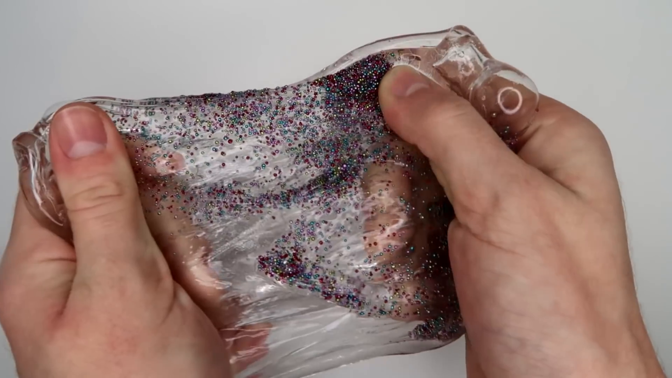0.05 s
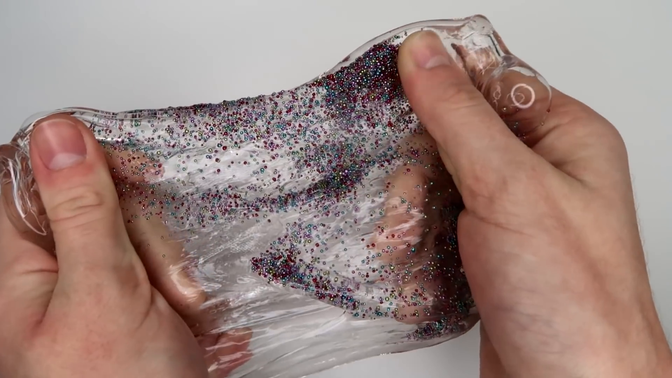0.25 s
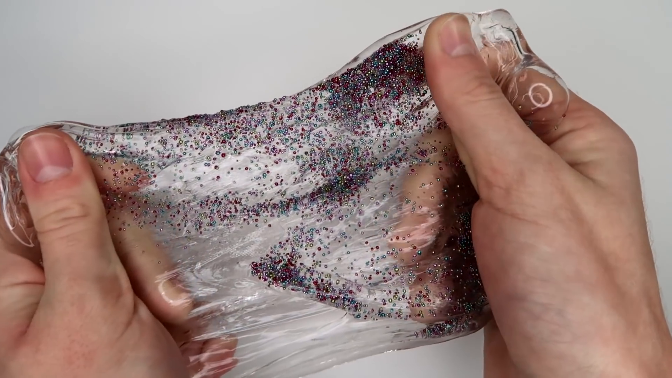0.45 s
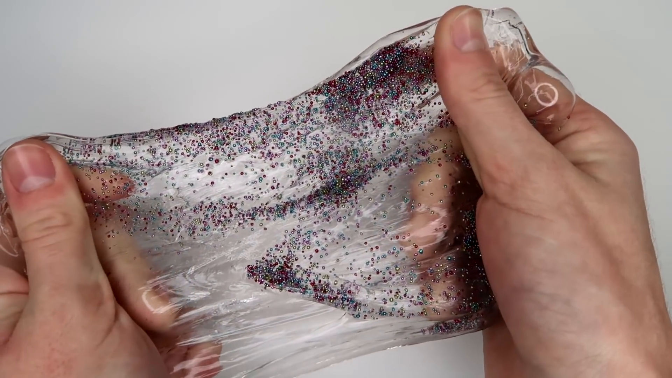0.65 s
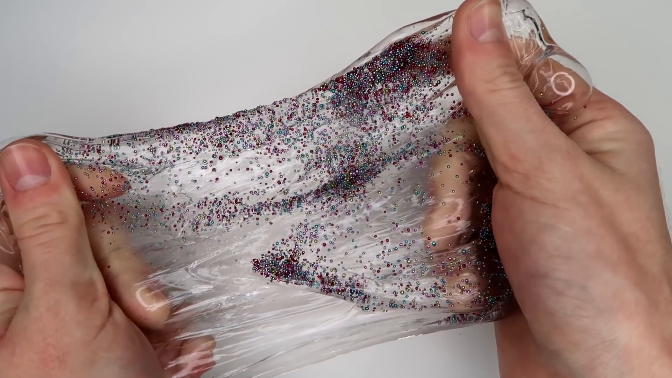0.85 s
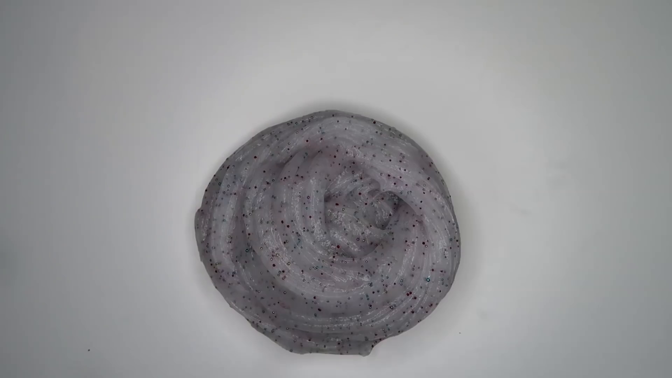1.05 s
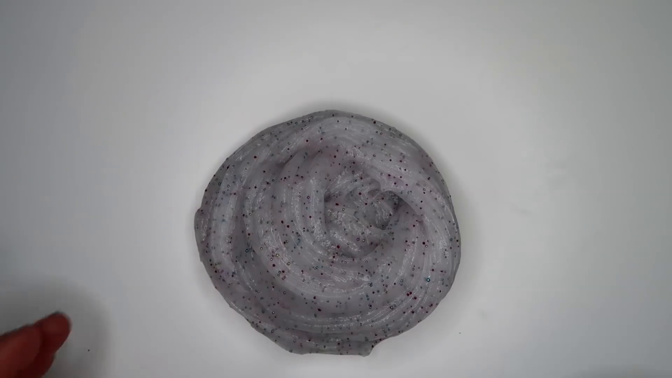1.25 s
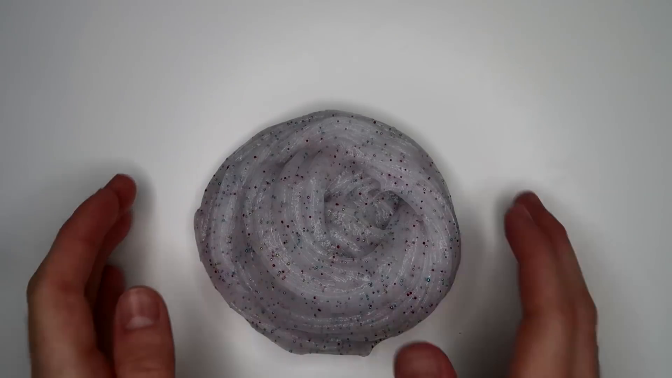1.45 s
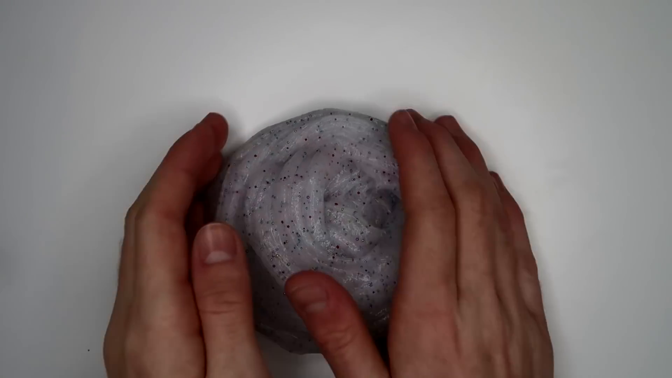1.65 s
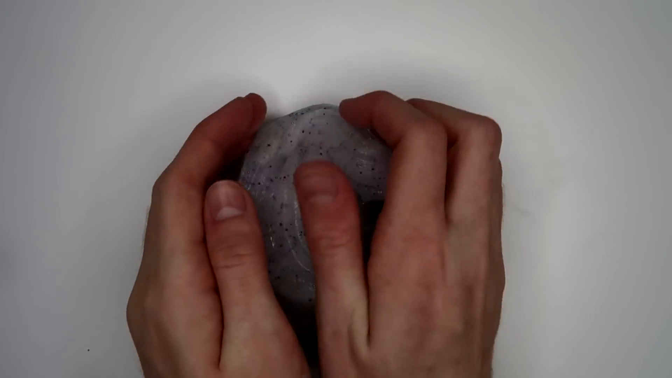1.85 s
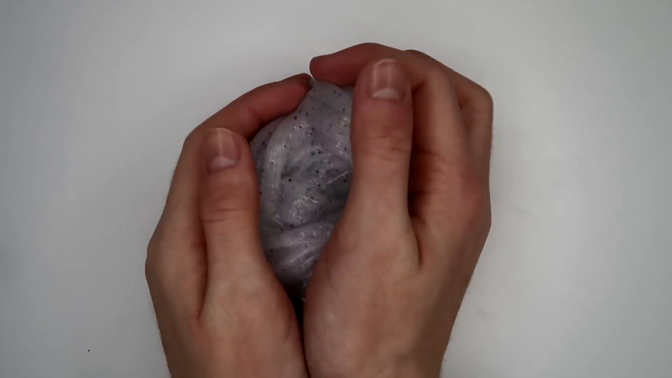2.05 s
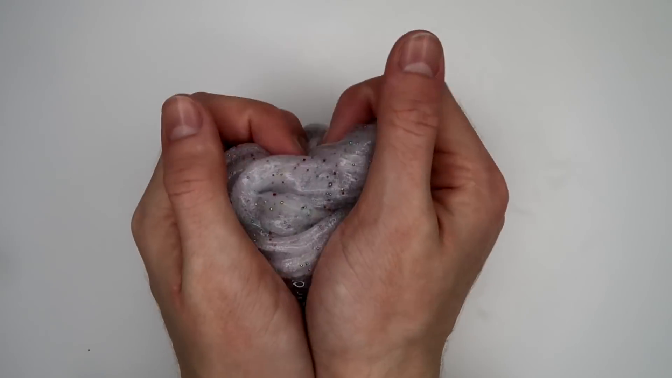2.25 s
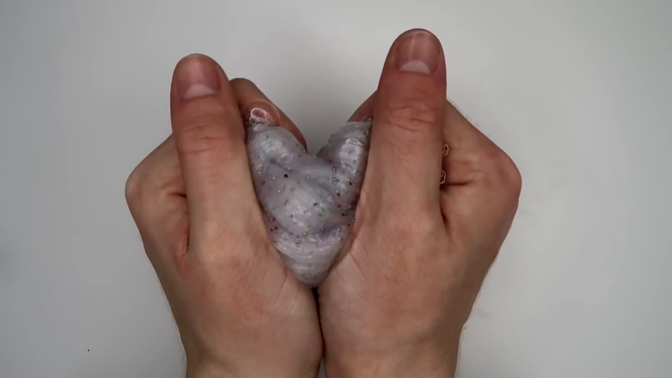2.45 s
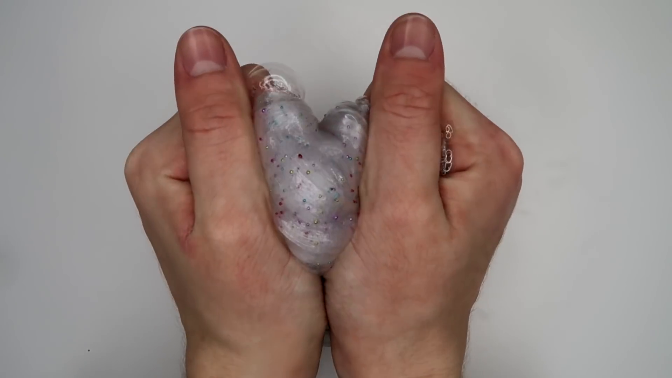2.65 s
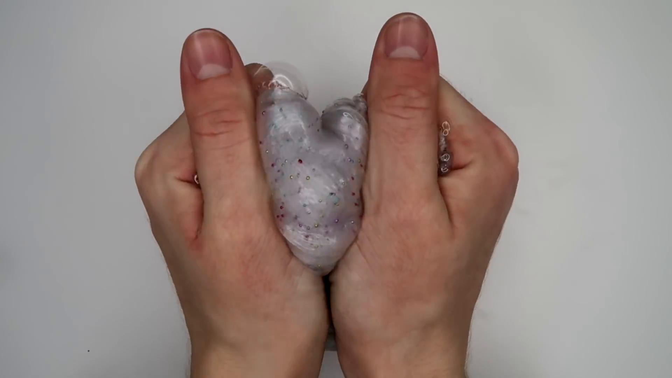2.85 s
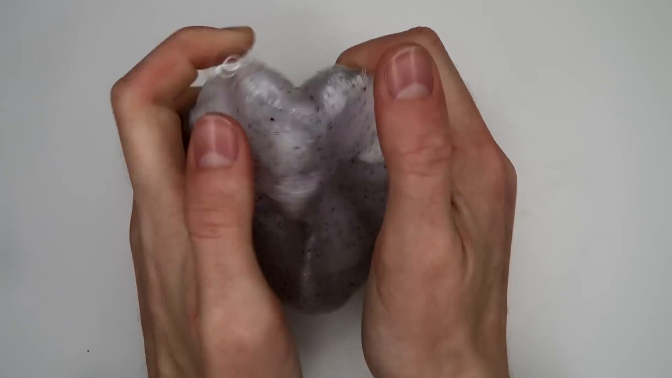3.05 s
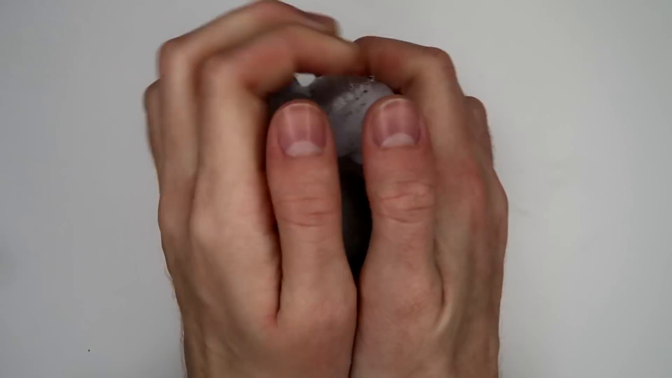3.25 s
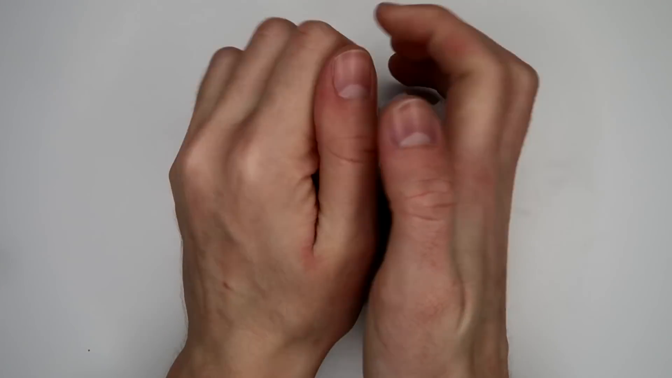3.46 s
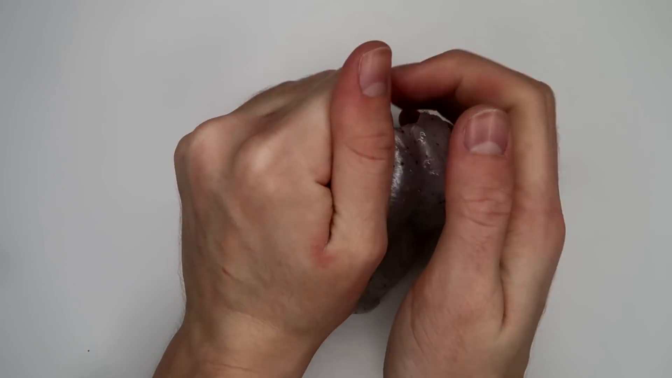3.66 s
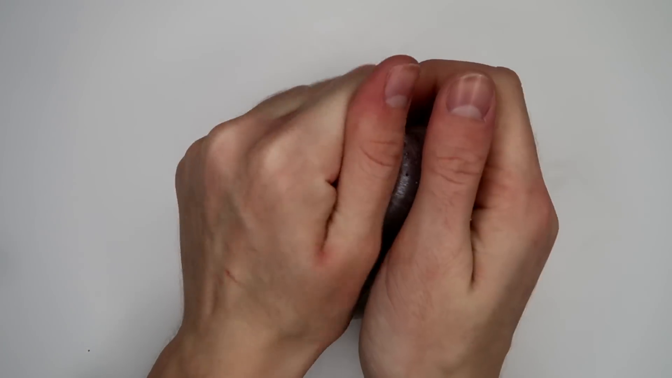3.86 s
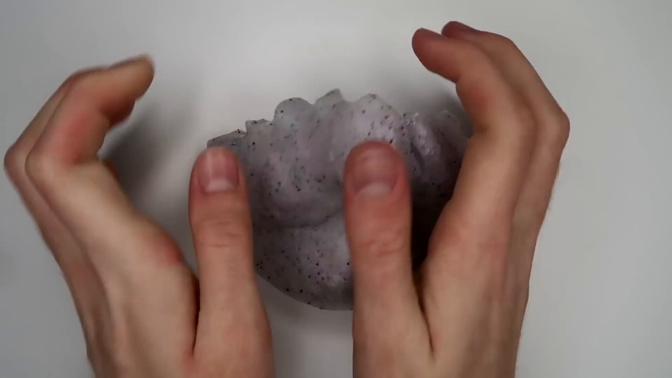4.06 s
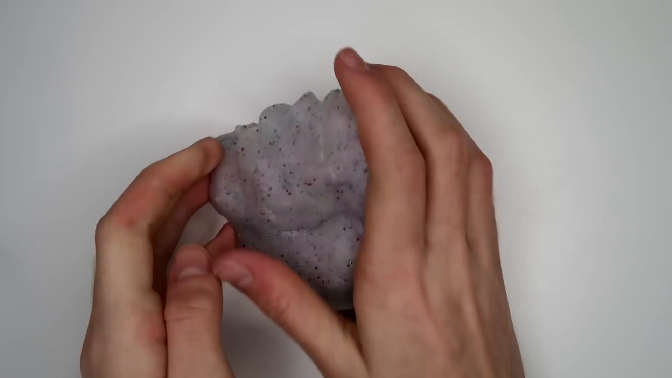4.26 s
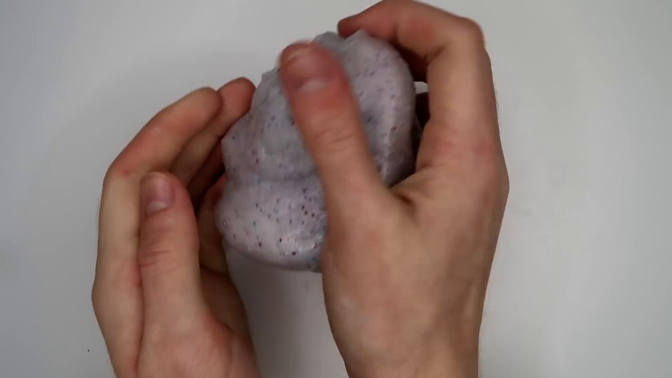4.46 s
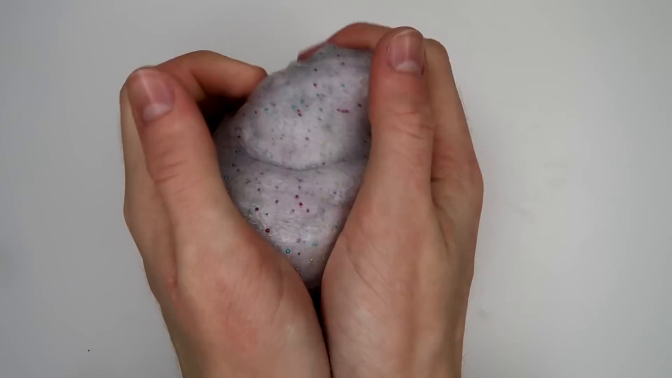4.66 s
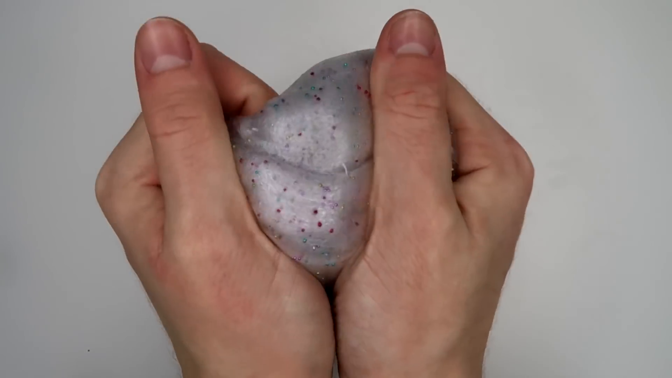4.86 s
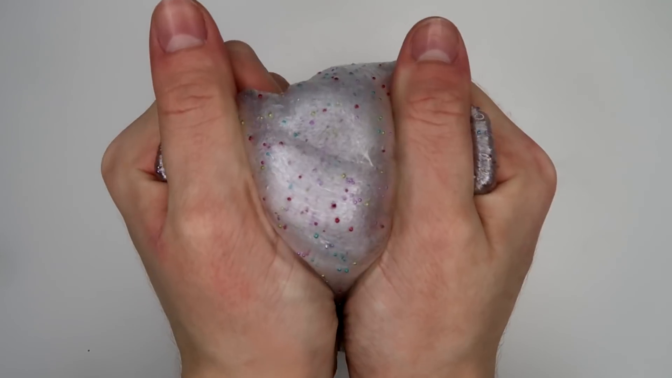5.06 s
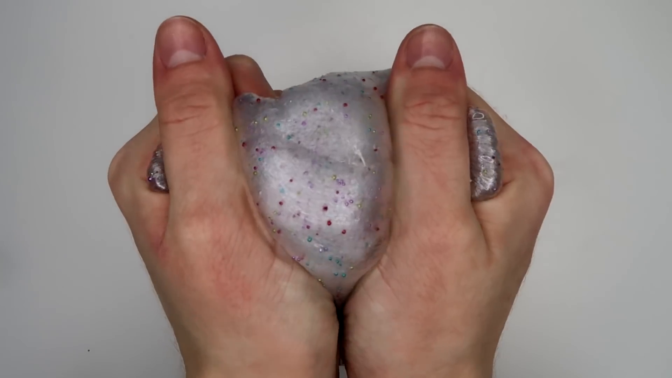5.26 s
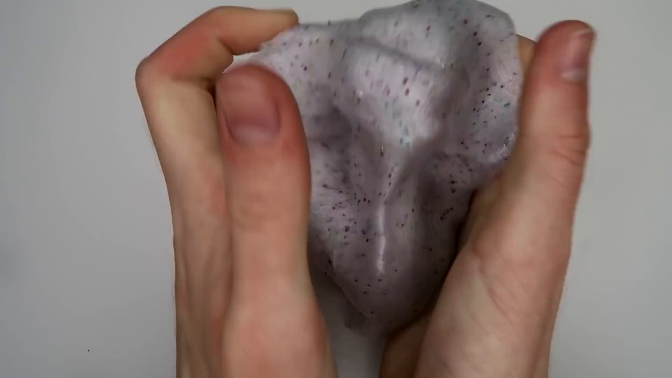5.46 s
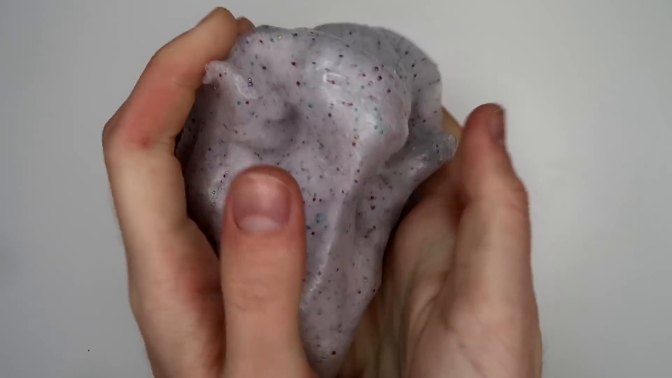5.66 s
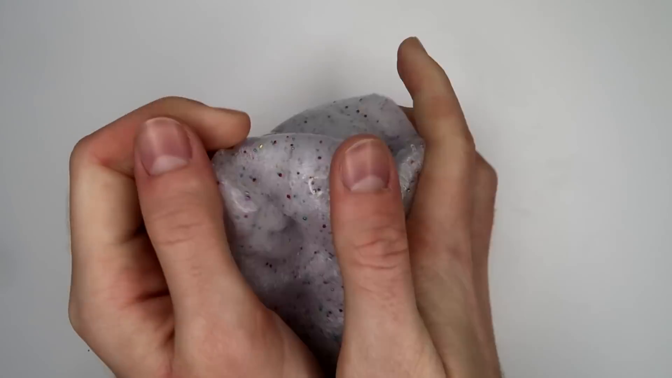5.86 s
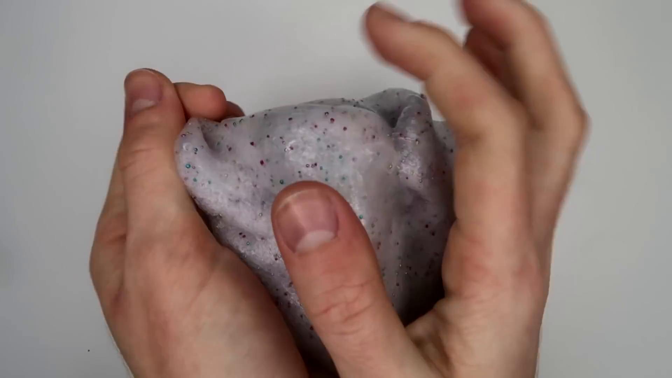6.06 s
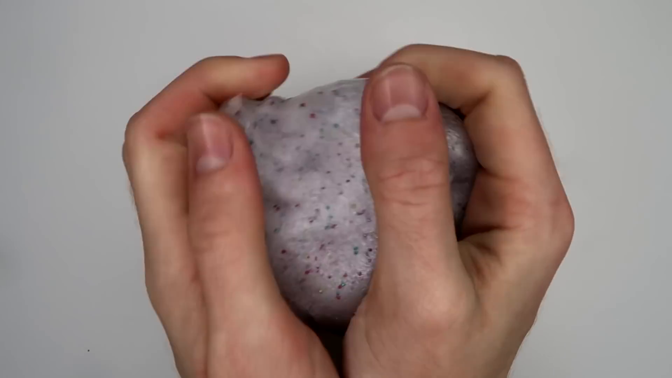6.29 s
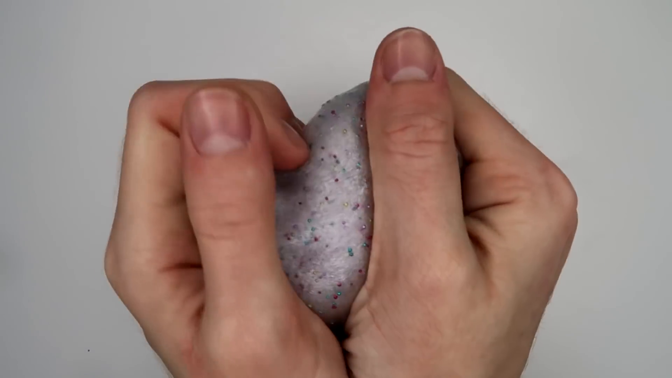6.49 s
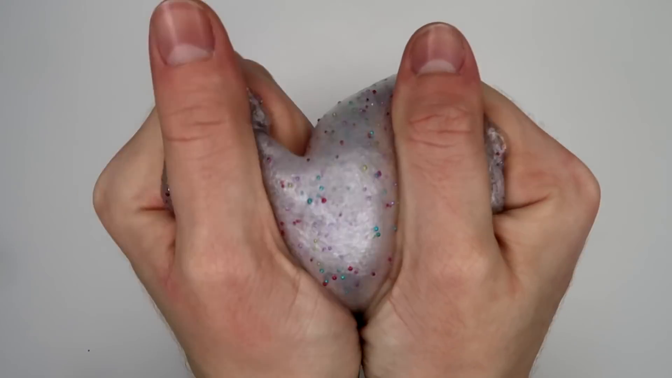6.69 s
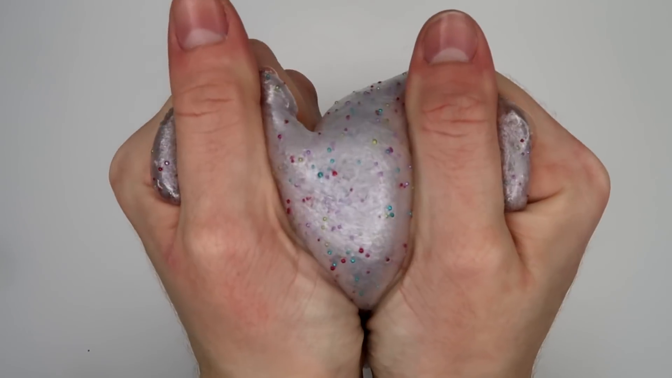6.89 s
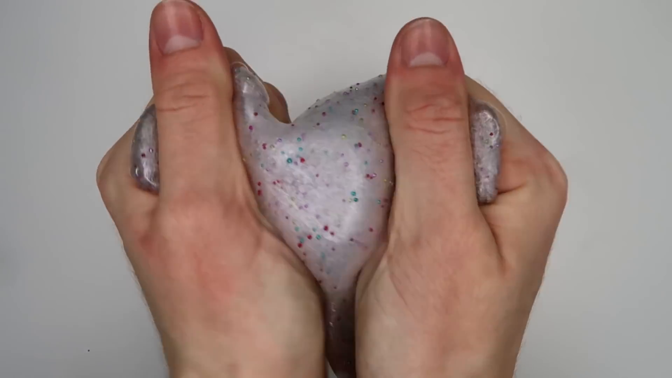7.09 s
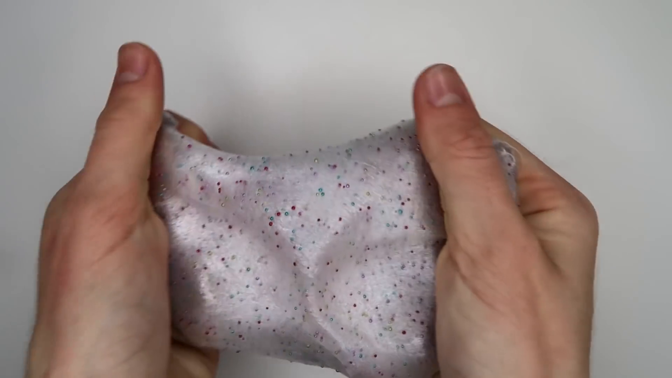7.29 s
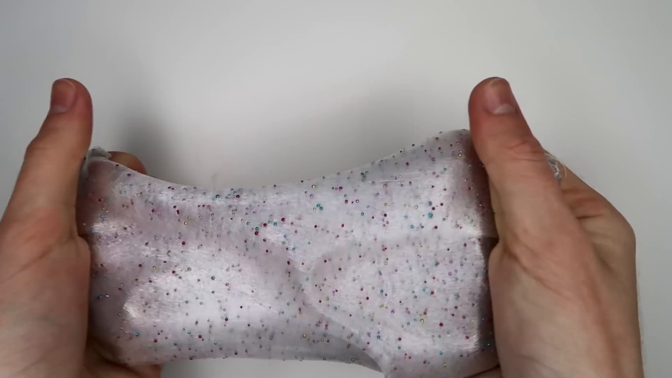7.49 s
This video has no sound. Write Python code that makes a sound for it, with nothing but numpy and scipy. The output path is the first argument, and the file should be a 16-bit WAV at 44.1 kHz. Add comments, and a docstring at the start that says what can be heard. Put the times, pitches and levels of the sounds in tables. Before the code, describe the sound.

Quiet air hiss and low mains hum open, with a couple of dull table knocks. Then two hands knead sticky slime: dense wet crackle swells and fades, small threads snap, and trapped air bursts in sharp ringing pops, some loud enough to distort. A sparser lull follows before more squeezing and crackling. Very close stereo microphone, small room, quick faint table echoes.

```python
"""Air noise and mains hum are heard first and run throughout, with dull knocks before and during the kneading.
Two hands knead sticky slime above a table: skin peels off the goo in dense wet crackle, made of countless
ringing grains and thicker snapping threads; air inside the lump blips softly.
Trapped air pockets burst as short ringing pops, loud enough to overload.
Table and palms throw quick delayed echoes, the small room a short noise tail, into two close microphone ports."""
import sys
import numpy as np
from scipy import signal
from scipy.fft import rfft, irfft
from scipy.io import wavfile

SR = 44100
rng = np.random.default_rng(int(sys.argv[2]) if len(sys.argv) > 2 else 0)


def to_wav(sig):
    """Store sig (one row per channel, or 1-D mono) as 16-bit WAV at the path in sys.argv[1].

    Samples outside -1..1 are clipped; the rate is SR.
    """
    pcm = np.clip(np.atleast_2d(sig), -1, 1) * 32767
    pcm = np.round(pcm).astype(np.int16)
    wavfile.write(sys.argv[1], SR, pcm.T)  # frames by channels


N = 332073

# bursting air pockets: start_s, level_db, pocket_hz (at the start), palm_hollow_hz,
# hollow_db and snap_db (both relative to level_db)
POPS = [(2.126, -29.5, 2420, 1400, -1.5, -5), (2.2, -25, 2100, 1310, 4.5, -5),
        (2.2631, -31.5, 3300, 890, -20, 1), (2.2673, -24.5, 3440, 1500, -1.5, -2.5),
        (2.291, -22.5, 7040, 1490, -28, -3), (2.3587, 1, 4030, 560, -6, -5),
        (2.3601, 7, 3360, 1380, -6, -4), (2.413, -16, 2270, 1730, 0.5, -1.5),
        (2.489, -28, 3050, 357, 0, 12.5), (2.52, -34, 4110, 846, 3, 1), (2.5455, 6, 3055, 681, -14, -4.5),
        (2.5992, 10.5, 5680, 1350, -13, -10.5), (2.6211, -2, 5500, 1430, -14, -10),
        (2.6454, -2.5, 2330, 693, -6.5, 4.5), (2.7046, -32, 2460, 695, 1, -5),
        (2.751, -27, 3060, 1150, -20, 12), (2.771, -17, 3200, 1460, -14, 3),
        (2.8125, 2, 6140, 764, -16.5, -9), (2.8128, -7.5, 2970, 770, -31, -24),
        (2.872, -26.5, 2940, 1040, -8.5, -31), (2.959, -34, 3440, 390, -3, -28),
        (3.026, -33, 2620, 560, -1, -23), (3.071, -30.5, 2520, 790, -5, -34.5),
        (3.153, -38.5, 2450, 1435, 7.5, -28), (3.384, -30.5, 5400, 750, -8, -38),
        (3.4581, -21, 2320, 1370, 0.5, -9), (3.6035, -28, 2680, 925, -8, 3),
        (3.608, -21, 3440, 500, -14.5, -11), (3.634, -22.5, 1670, 840, 0, -21),
        (3.6375, -19, 3000, 870, -2, -23), (3.6485, -30, 2680, 1400, -20, -5),
        (3.6905, 13, 6080, 1500, -40, -16), (3.7444, -22.5, 2400, 740, -1.5, -29),
        (3.7799, -28, 2870, 993, -4.5, -7), (3.888, -40, 3170, 900, -5, -15),
        (3.933, -35, 2450, 417, -2.5, -11), (4.851, -13.5, 2980, 755, -6, -8),
        (4.92, -17, 7750, 832, -23, -9), (4.931, -17.5, 2840, 1460, -9, 6.5),
        (4.945, -18, 2700, 800, -7.5, -11), (4.974, -9, 2690, 740, -8, -8),
        (4.989, -7.5, 2370, 800, -9.5, -25), (5.0109, -22.5, 2480, 796, -6, -6),
        (5.089, -26, 2200, 1310, 1.5, -17), (5.113, 8.5, 2706, 727, -16.5, -8),
        (5.1795, -10.5, 6560, 705, -30, -6.5), (5.186, -12.5, 2940, 993, -30, -20),
        (5.2055, -16.5, 5940, 435, -39, -9.5), (5.236, -18, 2110, 1420, 1, -32),
        (5.258, -18.5, 2850, 830, -9, -11.5), (5.304, -39, 2389, 1300, -24, 7),
        (5.344, -34, 7200, 455, -31, -22), (5.605, -25.5, 6600, 762, -39, -4.5),
        (5.758, -28, 4600, 790, -4, -9), (6.0004, -30.5, 5950, 1380, -2, -7),
        (6.269, -26, 3140, 850, -2.5, -33), (6.4473, -6, 11550, 825, -30, -20.5),
        (6.488, -26.5, 2510, 870, 0, -25), (6.526, -35, 2080, 1370, 1.5, -20),
        (6.5715, -22.5, 9350, 767, -32, -6), (6.5963, 3.5, 12000, 900, -35.5, -20.5),
        (6.6, -31, 2400, 800, -12, 4), (6.6087, -14, 10500, 1310, -21, -10),
        (6.6316, -29, 4560, 780, -7, 6), (6.636, -28.5, 5930, 1130, 0.5, -16),
        (6.696, -13, 7260, 764, -13.5, -8), (6.7236, -19.5, 2270, 425, -1.5, 0),
        (6.7267, -23.5, 2980, 490, -4.5, 6.5), (6.7518, -22, 5800, 412, -10, -3),
        (6.7724, -7.5, 5600, 797, -18, -3), (6.7749, -14.5, 2770, 780, -15, 2),
        (6.7893, -17.5, 2900, 1100, -6.5, -15), (6.8055, 8.5, 2630, 394, -26, -6),
        (6.869, -22, 2620, 860, -8, -30), (6.873, -22.5, 3280, 1320, -4.5, -19),
        (6.951, -30.5, 2940, 700, -1.5, -12), (6.9936, -29, 2980, 845, -10, -6),
        (7.298, -31, 3400, 475, -11, -10)]
# spectrum of the peeling crackle: pitch_hz, density_db (per Hz)
PEEL_COLOUR = [(200, -1.5), (380, 2), (560, -3), (820, -0.5), (1080, -8), (1430, -1.5), (1900, -17),
               (2600, -8.5), (3250, -9.5), (3900, -14), (6000, -18), (12000, -23.5), (15500, -25)]
# edges of the deep, middle and fine grain ranges: edge_hz
PEEL_SPLITS_HZ = [200, 1800, 5000, 15500]
# deep, middle and fine grains, the small ones being the many: grains_per_s
PEEL_GRAINS_PER_S = [3000, 5500, 14000]
# skin peeling off, one row a pull: loudest_s, swell_s, fade_s, middle_db, deep_db and fine_db (relative to middle_db)
PULLS = [(1.74, 0.27, 0.85, -53.5, -2, -4.5), (2.0, 0.34, 0.2, -46.5, -0.5, -4.5),
         (2.28, 0.56, 0.17, -61.5, 8.5, 0), (2.374, 0.026, 0.18, -42.5, 5, -19),
         (2.46, 0.1, 0.044, -47, -9, 10), (2.62, 0.18, 0.15, -39.5, 3, 0), (2.8, 0.05, 0.15, -48.5, 1, 0),
         (3.081, 0.18, 0.14, -53, 6, -3), (3.3, 0.076, 0.07, -64.5, 8.5, -11.5),
         (3.389, 0.062, 0.068, -60, 5, -4), (3.47, 0.076, 0.15, -59, 2.5, -5.5),
         (3.631, 0.023, 0.17, -48.5, 7, -7.5), (3.76, 0.17, 0.077, -54.5, 0.5, 2.5),
         (3.945, 0.033, 0.12, -52.5, 11.5, -2), (3.999, 0.089, 0.047, -52, 5, -3),
         (4.359, 0.046, 0.075, -64.5, -8.5, 14.5), (4.399, 0.043, 0.051, -52, 3, 1),
         (4.45, 0.066, 0.055, -55.5, 1, -7), (4.51, 0.059, 0.033, -53, 0.5, -8.5),
         (4.87, 0.078, 0.093, -56.5, 6.5, -0.5), (4.98, 0.061, 0.1, -40, 0.5, -3.5),
         (5.15, 0.21, 0.21, -52.5, 3.5, -2), (5.124, 0.023, 0.16, -41, -3, -9),
         (5.25, 0.33, 0.041, -56, -15.5, -3), (5.428, 0.024, 0.18, -45, 7.5, -9),
         (5.4, 0.0072, 0.088, -47, -14, -1), (5.459, 0.072, 0.13, -42, -17, -1),
         (5.529, 0.19, 0.026, -48.5, 11, 0), (5.68, 0.056, 0.12, -49.5, 0.5, -2),
         (5.86, 0.095, 0.081, -42.5, 3.5, -8.5), (6.009, 0.36, 0.26, -56.5, 5, -4),
         (6.21, 0.086, 0.16, -57, -3, 1), (6.282, 0.056, 0.045, -44.5, 5, -13),
         (6.35, 0.12, 0.18, -57, -5, -1.5), (6.61, 0.14, 0.92, -57, -0.5, 4.5),
         (6.78, 0.14, 0.18, -40.5, -6, -17), (6.82, 0.039, 0.046, -35.5, -9, 7),
         (6.998, 0.23, 0.058, -65, -5, 5.5), (7.189, 0.043, 0.27, -52, 6.5, 0),
         (7.348, .06, 0.028, -51, -9, -18.5)]
# thicker threads at random, rows deep, middle, fine: pitch_hz, snaps_per_s, above_crackle_db (smallest snap)
TICKS = [(1300, 25, 8), (3000, 60, 11), (7000, 45, 13)]
# the clearest thread snaps: start_s, level_db, pitch_hz
THREADS = [(1.874, -26, 9000), (1.926, -22, 11000), (1.983, -29, 4500), (2.2523, -35, 5880),
           (2.298, -30, 4650), (2.441, -20, 3270), (2.477, -28, 3420), (2.5095, -36, 3380),
           (2.525, -27, 4500), (3.101, -27.5, 9500), (3.221, -35, 5800), (3.3541, -35, 3370),
           (4.346, -38, 6220), (4.3547, -31, 6080), (4.363, -35.5, 6000), (4.3795, -21.5, 10600),
           (4.3828, -23, 8000), (4.3885, -22, 7500), (4.3954, -19, 9100), (4.3997, -27.5, 11220),
           (4.703, -34, 3280), (4.736, -38, 1430), (5.684, -32, 1450), (5.886, -31, 3220),
           (5.974, -32, 2700), (6.691, -31, 3100), (6.746, -28, 5060), (6.7638, -23, 5500),
           (7.145, -41, 2900), (7.276, -31, 3000)]
# soft wet blips, air shifting inside the lump: start_s, level_db, pitch_hz
BLIPS = [(5.502, -29, 690), (5.74, -41, 810), (5.756, -42, 830), (5.999, -36.5, 788), (6.096, -42, 805),
         (6.198, -43, 807)]
# dull knocks through the table top: start_s, level_db, pitch_hz
KNOCKS = [(.87, -46, 214), (.99, -50, 190), (1.743, -43.5, 277), (1.839, -47, 239), (2.046, -43.5, 250),
          (2.04, -47, 285), (3.6, -49, 245), (3.642, -48, 224.5), (3.929, -45.5, 240), (4.19, -50, 200.6)]
# quick echoes off table and palms: late_s, level_db
ECHOES = [(.0012, -27.5), (.0018, -15.5), (.0044, -18)]
# course of the background, sinking after some of the loudest pops and creeping back: time_s, level_db
BACKGROUND_COURSE = [(0.0, -56.5), (1.66, -57.5), (2.05, -54.5), (2.49, -61), (2.62, -65), (2.7, -71.5),
                     (3.2, -68.5), (3.62, -66), (3.8, -74), (3.94, -65.5), (4.3, -63.5), (4.4, -62),
                     (4.97, -61), (6.63, -57), (6.82, -64.5), (7.53, -57.5)]
# spectrum of the air noise: pitch_hz, density_db (per Hz)
AIR_COLOUR = [(12, -20.5), (20, -7), (90, -1.5), (122, -5.5), (148, -5), (225, -8.5), (266, -6), (362, -8),
              (958, -15.5), (1630, -17), (10800, -33), (13500, -34.5), (15500, -47.5)]
# how alike the air noise is at the two ports: pitch_hz, likeness (1 same, 0 unrelated, -1 opposite)
AIR_LIKENESS = [(60, 1), (180, 0.66), (550, -0.31), (1650, -0.19), (4970, 0.0056), (15000, -0.68)]
# mains lines and one faint high whine: pitch_hz, level_db (relative to the background course)
HUM_LINES = [(60, -6.5), (120, -1), (240, -10.5), (13006, -36)]

TOUCH_S = 1.4   # the hands first touch the slime
CLING_DB = [-82, -75.5, -79.5]   # between pulls they still cling: deep, middle, fine
SWELL_DB = 20   # a pull gains this over its swell and loses it over its fade
ROOM_T60_S, ROOM_DB, ROOM_DULL_HZ = .23, -24.5, 6000
CUTOFF_HZ = 16600


def amp(db):
    """Decibels to gain."""
    return 10 ** (np.asarray(db) / 20)


def rms_one(x):
    """Scale to unit rms."""
    return x / np.sqrt(np.mean(x ** 2) + 1e-20)


def in_time(rows):
    """Columns of a table, joined by straight lines, one value a sample."""
    s, *columns = np.transpose(rows)
    return [np.interp(np.arange(N) / SR, s, c, left=c[0]) for c in columns]


def at_hz(points, hz):
    """Value of a spectrum on a log-frequency axis."""
    point_hz, value = np.array(points).T
    return np.interp(np.log(hz), np.log(point_hz), value)


def drift(corner_hz):
    """Slow random wander of unit rms: noise through two equal low-pass poles, drawn every 40 samples."""
    r = np.exp(-2 * np.pi * corner_hz * 40 / SR)
    slow = signal.lfilter([1], [1, -2 * r, r * r], rng.standard_normal(N // 40 + 2002))[2000:]
    return np.interp(np.arange(N) / 40, np.arange(len(slow)), rms_one(slow))


def ring(clicks, hz, t60_s):
    """A unit click sets a decaying sine of height 1 ringing."""
    r, w = amp(-60 / (t60_s * SR)), 2 * np.pi * hz / SR
    return signal.lfilter([0, np.sin(w)], [1, -2 * r * np.cos(w), r * r], clicks + 1e-18)


def add(out, s, sound):
    """Mix a short sound in at a time."""
    i = round(s * SR)
    out[i:i + len(sound)] += sound[:N - i]


def swelling_tones(rows, peak_s):
    """Each row swells to its level after peak_s and fades, on one mode."""
    out, t = np.zeros(N), np.arange(8000) / SR
    swell = t / peak_s * np.exp(1 - t / peak_s)
    for s, db, hz in rows:
        add(out, s, amp(db) * swell * np.sin(2 * np.pi * hz * t))
    return out


def pops(pocket_cycles=15.5, hollow_cycles=7.16, snap_s=0.00091, rise_s=0.00018, snap_hz=1600,
         upper=1.78, upper_db=-7.0, climb_per_s=18.0):
    """A pocket rings, climbing as it opens; the palms' hollow answers on two modes; the tearing skin snaps."""
    out, t = np.zeros(N), np.arange(1200) / SR
    tear = rng.standard_normal((len(POPS), len(t)))
    bright = signal.butter(2, [snap_hz, 11500], "band", fs=SR, output="sos")
    rise = 1 - np.exp(-t / rise_s)
    climb = 1 + climb_per_s * np.minimum(t, .006)   # stretches the phase
    for (s, db, hz, low_hz, low_db, snap_db), noise in zip(POPS, tear):
        # each rings down 60 dB in its number of cycles
        pocket = np.sin(2 * np.pi * hz * t * climb) * amp(-60 * t * hz / pocket_cycles)
        low_mode = np.sin(2 * np.pi * low_hz * t)
        upper_mode = amp(upper_db) * np.sin(2 * np.pi * upper * low_hz * t)
        hollow = (upper_mode - low_mode) * amp(-60 * t * low_hz / hollow_cycles)
        snap = signal.sosfilt(bright, noise * np.exp(-t / snap_s))
        snap = snap / np.abs(snap).max()
        # what the hollow takes is missing from the pocket, down to a floor
        share = np.sqrt(max(1 - amp(low_db) ** 2, .05))
        burst = share * pocket + amp(low_db) * hollow + amp(snap_db) * snap
        add(out, s, amp(db) * rise * burst)
    return out


def peel_levels():
    """Level in dB of deep, middle and fine grains: every pull swells and fades in straight dB, powers add."""
    t = np.arange(0, N, 64) / SR
    power = amp(np.array(CLING_DB)[:, None] + 0 * t) ** 2
    for s, swell_s, fade_s, db, deep_db, fine_db in PULLS:
        shape_db = db - SWELL_DB * np.maximum((s - t) / swell_s, (t - s) / fade_s)
        power = power + amp(shape_db + np.array([[deep_db], [0], [fine_db]])) ** 2
    return [np.interp(np.arange(N) / SR, t, 10 * np.log10(p)) for p in power]


def peeling(spread_db=4.0, clump_db=2.2, patchy_db=2.2, cycles=26.0):
    """Countless tiny threads and bubbles let go, each ringing at a pitch set by its size; sizes come in patches."""
    out = np.zeros(N)
    fade_in = np.clip((np.arange(N) / SR - TOUCH_S) / 0.14, 0, 1)
    ranges = zip(peel_levels(), PEEL_SPLITS_HZ, PEEL_SPLITS_HZ[1:], PEEL_GRAINS_PER_S)
    for level_db, low_hz, high_hz, per_s in ranges:
        # a few grains are far stronger than most
        strengths = amp(spread_db * np.minimum(rng.exponential(1, N), 5)) * rng.choice([-1, 1], N)
        clicks = strengths * (rng.random(N) < per_s / SR)
        pitches = np.geomspace(low_hz, high_hz, 15)[1:-1]
        dealt = rng.integers(0, 13, N)   # which pitch a grain gets
        grains = np.zeros(N)
        for k, hz in enumerate(pitches):
            patches = amp(at_hz(PEEL_COLOUR, hz) + patchy_db * drift(7.7))
            # times hz: higher rings are shorter and stand for a wider step of the spectrum
            grains += patches * hz * ring(clicks * (dealt == k), hz, cycles / hz)
        out += amp(level_db + clump_db * drift(21)) * rms_one(grains)
    return out * fade_in


def ticks(spread_db=4.0, cycles=4.0):
    """Now and then a thicker thread snaps, a very short ring well above the crackle around it."""
    out, started = np.zeros(N), np.arange(N) / SR > TOUCH_S
    for level_db, (hz, per_s, above_db) in zip(peel_levels(), TICKS):
        strengths = amp(spread_db * np.minimum(rng.exponential(1, N), 2.5))
        clicks = strengths * (rng.random(N) < per_s / SR) * started
        out += amp(level_db + above_db) * ring(clicks, hz, cycles / hz)
    for s, db, hz in THREADS:
        add(out, s, amp(db) * ring(np.arange(300) == 0, hz, cycles / hz))
    return out


def blips():
    """Air shifting inside the lump sounds one soft, quickly damped mode."""
    return swelling_tones(BLIPS, peak_s=0.0025)


def knocks():
    """The table top carries a dull knock: one low mode, slow to swell."""
    return swelling_tones(KNOCKS, peak_s=.016)


def surroundings(x):
    """Quick echoes, then a diffuse tail of its own at each port, treble dying first."""
    near = x.copy()
    soft = signal.sosfilt(signal.butter(1, 7000, fs=SR, output="sos"), x)   # skin swallows treble
    for late_s, db in ECHOES:
        lag = round(late_s * SR)
        near[lag:] += amp(db) * soft[:-lag]
    t = np.arange(round(.5 * SR)) / SR
    # reflections arrive in uneven bunches of 100 samples
    lumps = np.repeat(amp(4.0 * rng.standard_normal(len(t) // 100 + 1)), 100)[:len(t)]
    noise = rng.standard_normal((3, len(t))) * lumps
    dull = signal.sosfilt(signal.butter(1, ROOM_DULL_HZ, fs=SR, output="sos"), noise)
    bright = noise - dull
    tail = dull * amp(-60 * t / ROOM_T60_S) + bright * amp(-60 * t / (0.24 * ROOM_T60_S))
    tail = tail * np.clip(t / 0.0035 - .6, 0, 1)   # silent for 2 ms, then fades in
    tail = tail[0] + .4 * tail[1:]   # partly shared by the ports
    tail = tail / np.sqrt(np.sum(tail ** 2, axis=1, keepdims=True))
    return near, amp(ROOM_DB) * signal.fftconvolve(x[None], tail, axes=1)[:, :N]


def ports(x, apart_db=-5.0, move_hz=150):
    """Both ports hear the same bass; a wandering slope signal, opposite at each, parts the treble like a tiny lead."""
    side = np.gradient(x) * np.tanh(2 * drift(move_hz))
    return x + amp(apart_db) * side * [[1], [-1]]


def background(air_db=5.0, waver_db=1.8):
    """Air noise, alike at both ports in the bass only, with wavering mains lines and a faint whine."""
    hz = np.maximum(np.arange(N // 2 + 1) * SR / N, 10)
    alike = np.clip(at_hz(AIR_LIKENESS, hz), -1, 1)
    mid, side = rfft(rng.standard_normal((2, N))) * amp(at_hz(AIR_COLOUR, hz))
    air = irfft(np.sqrt(1 + alike) * mid + np.sqrt(1 - alike) * side * [[1], [-1]], N)
    hum = np.zeros(N)
    for line_hz, db in HUM_LINES:
        line = np.sqrt(2) * np.sin(2 * np.pi * line_hz * np.arange(N) / SR + rng.uniform(0, 8.7))
        hum += amp(db + waver_db * drift(2.4)) * line
    return amp(in_time(BACKGROUND_COURSE)[0]) * (amp(air_db) * rms_one(air) + hum)


def scene():
    """Slime close by, its echoes and tail, the table knocks, the background."""
    slime = pops() + peeling() + ticks() + blips()
    # small sources radiate no deep bass
    radiated = signal.sosfilt(signal.butter(1, [200, 12000], "band", fs=SR, output="sos"), slime)
    near, tail = surroundings(radiated)
    return ports(near) + tail + knocks() + background()


def record(dry):
    """The loudest pops clip; then a steep low-pass cuts the top."""
    clipped = np.clip(dry, -.94, .94)
    return signal.sosfilt(signal.cheby2(12, 70, CUTOFF_HZ, fs=SR, output="sos"), clipped)


dry = scene()
out = record(dry)
to_wav(out)
```